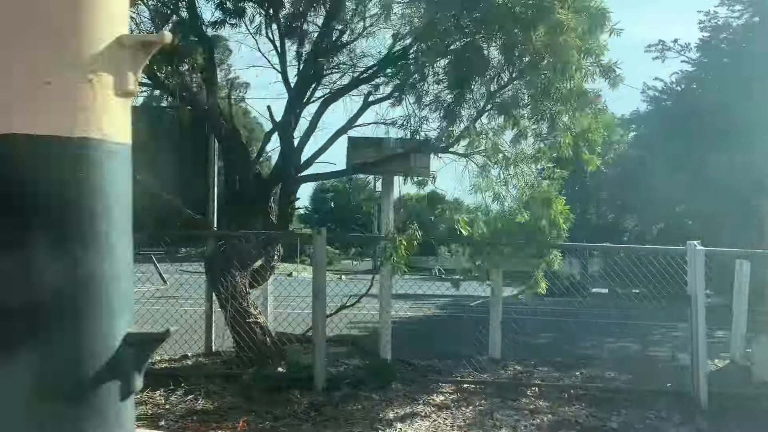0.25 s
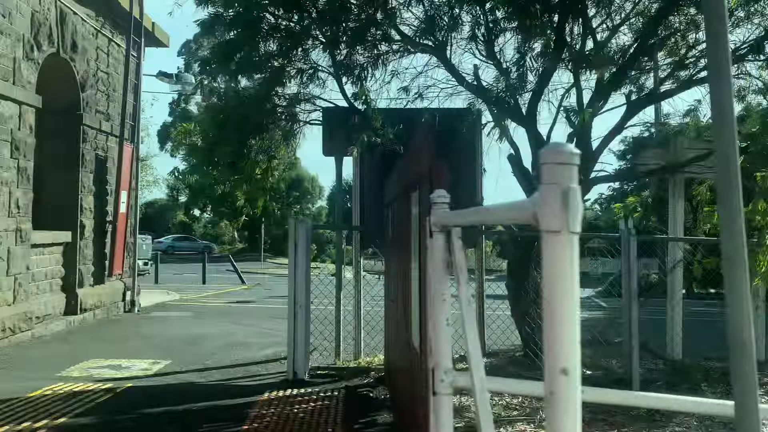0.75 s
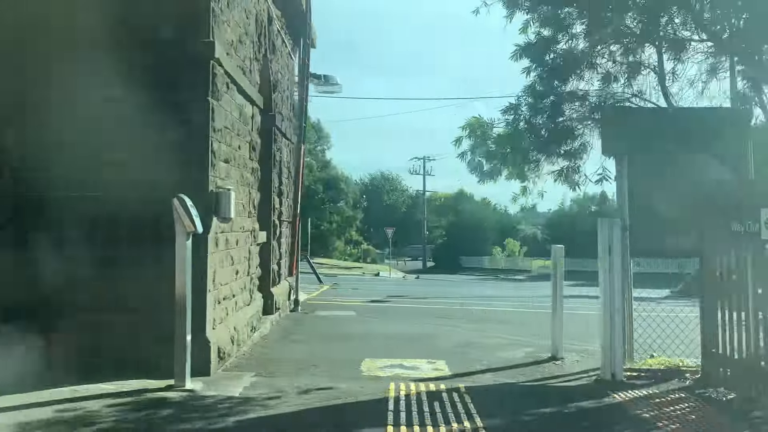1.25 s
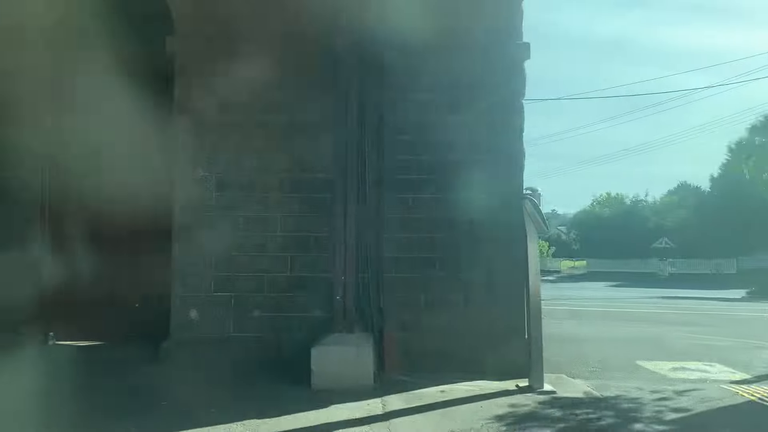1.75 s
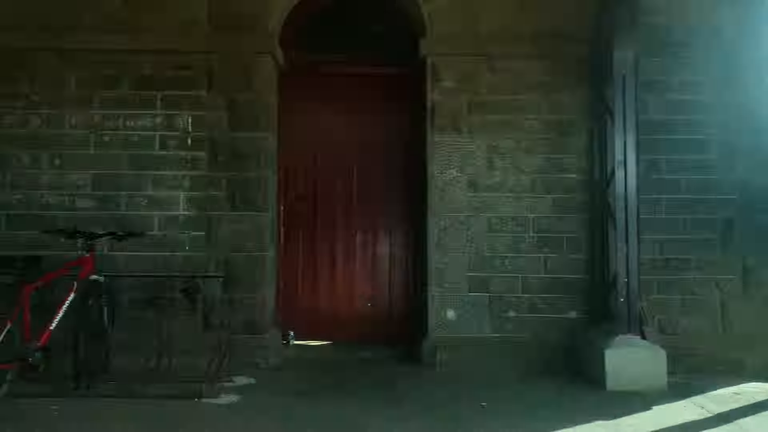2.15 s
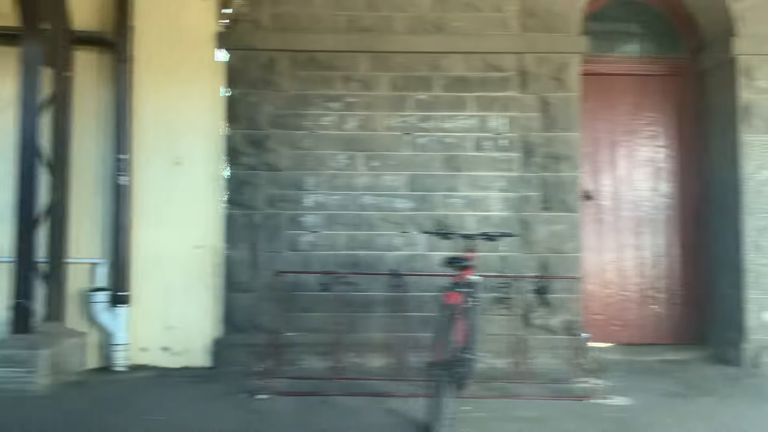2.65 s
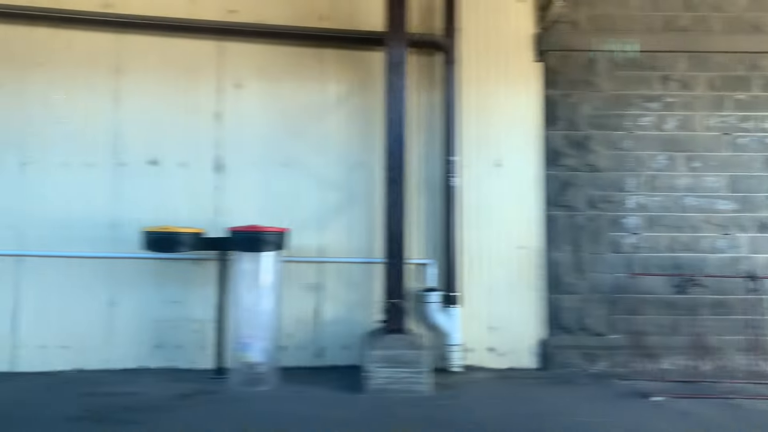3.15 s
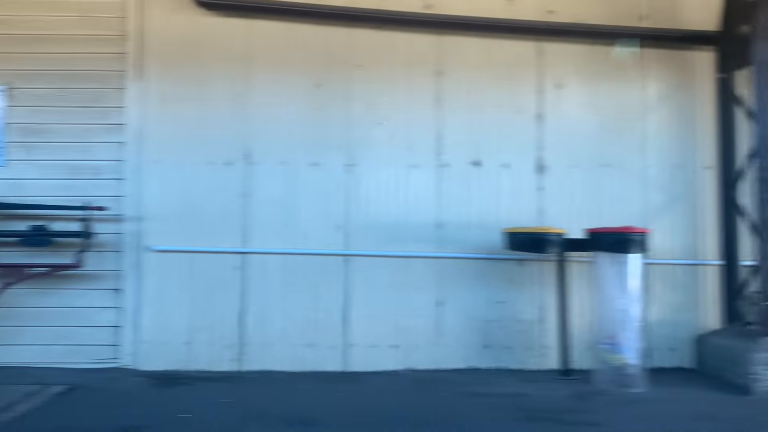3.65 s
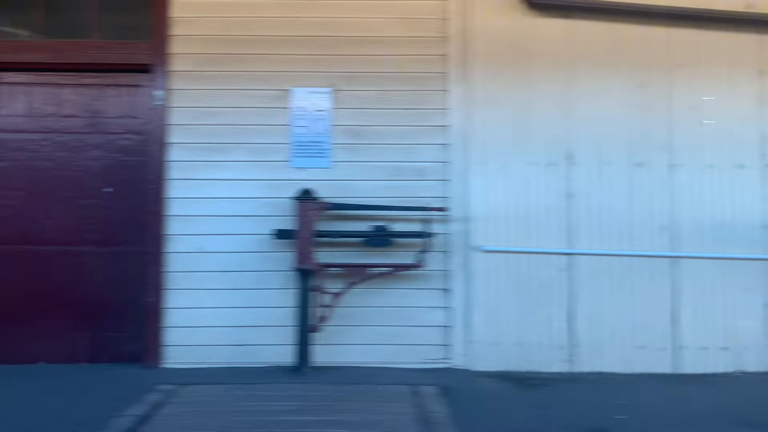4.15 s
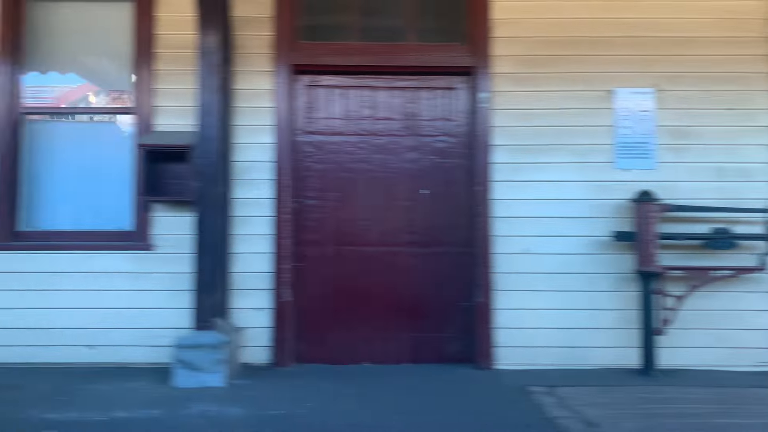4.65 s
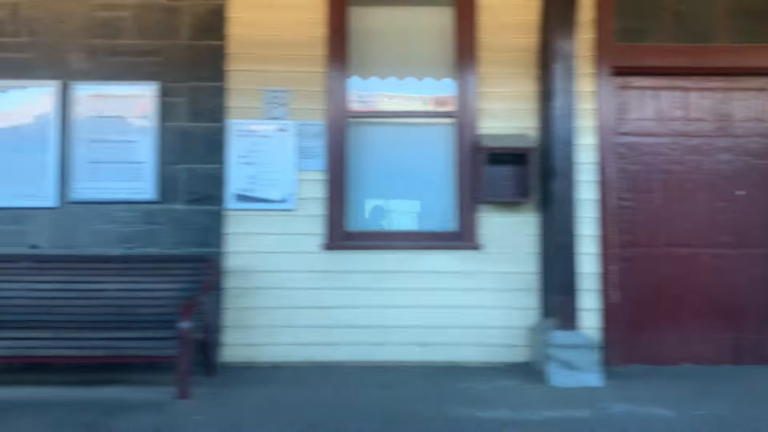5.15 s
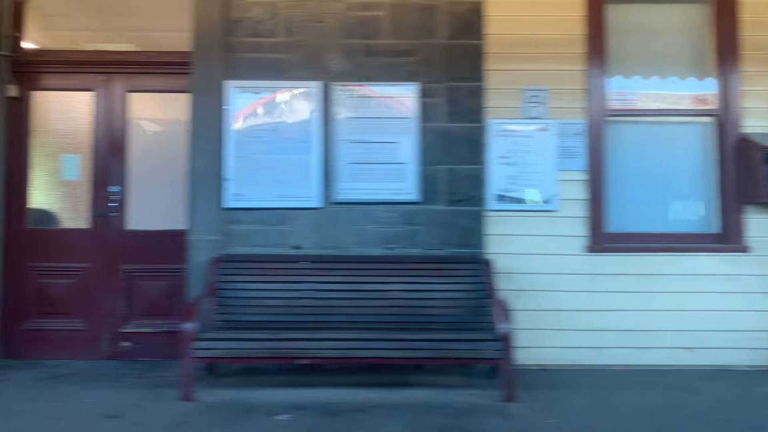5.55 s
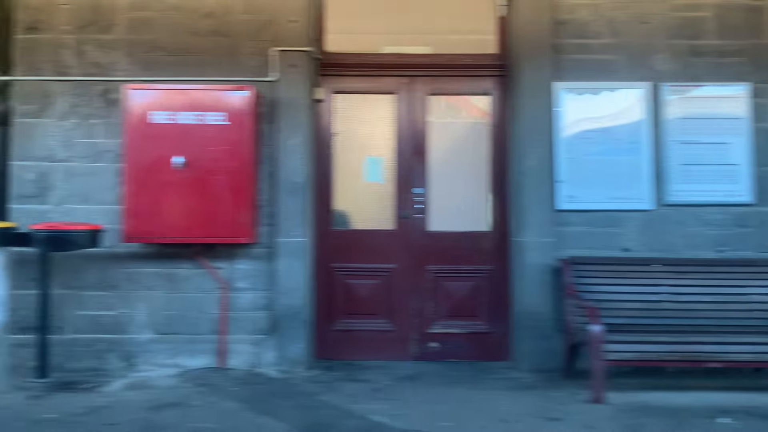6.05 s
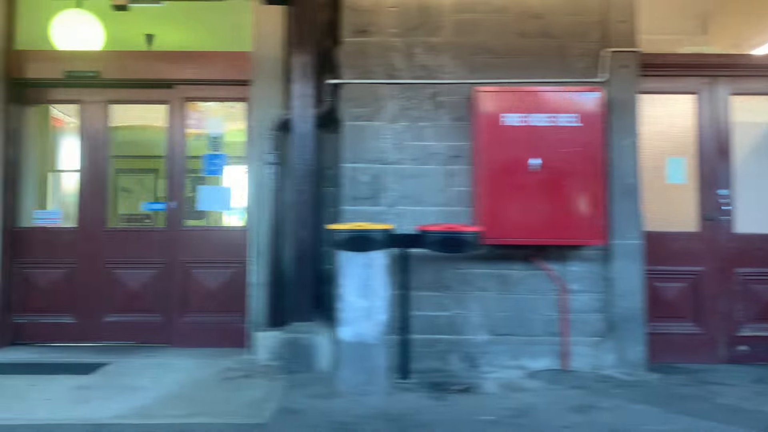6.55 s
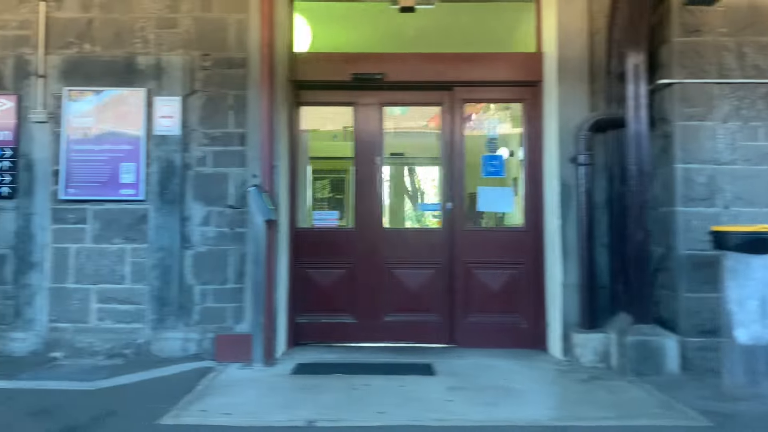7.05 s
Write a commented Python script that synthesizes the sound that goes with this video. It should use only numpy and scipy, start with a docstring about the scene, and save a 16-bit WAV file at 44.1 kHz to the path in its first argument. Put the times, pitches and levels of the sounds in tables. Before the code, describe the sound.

The interior of a diesel railcar rolling slowly past a station, captured in stereo inside the cabin. Throughout, a deep floor rumble dominates, swelling and sinking several times a second, with soft low thumps, notably around 2.2 and 2.9 s. Beneath it the engine drones near 56 Hz, wavering; above it are a faint mid whine, fan hums, diffuse cabin air and a hollow vent rush on the left. From 0.25 to 1.65 s a loose fitting on the right ticks rapidly in broken spells, gritty and bright, with faint high scrapes. From 1.65 to 4.1 s it is silent; a short scrape comes at 2.8, then a sharp click at 3.45, with weaker ones at 3.53 and 3.64. Rattling returns at 4.1, buzzes around 4.6, breaks into short bursts after 5.2, and runs strongest from 6.2 to the end at 7.3. A soft high hiss joins at 6.5, slowly fading, with a tiny click near 6.7.

```python
"""Inside a diesel railcar that rolls slowly past a station platform.
Band-filtered noise gives the wheels' rumble, swelling and lulling, the cabin's air and a resonant vent.
Sine waves give the engine's drone, a thin whine, fan tones, and low thumps and resonances that well up.
A loose fitting ticks in step with the engine: impulses with gritty tails. Decaying modes make sharp clicks.
Filtered noise makes soft, high scrapes, brief narrow-band sounds and, at the end, a hiss with a moving edge."""
import sys
import numpy as np
from scipy import signal
from scipy.fft import rfft, irfft
from scipy.io import wavfile
from scipy.ndimage import uniform_filter1d

SR = 44100
rng = np.random.default_rng(int(sys.argv[2]) if len(sys.argv) > 2 else 0)


def output_pcm(signal):
    """Save a mono or channel-first signal as 16-bit PCM at the path in sys.argv[1].

    Samples are clipped to [-1, 1] before scaling.
    """
    pcm = np.clip(np.atleast_2d(signal).T, -1, 1) * 32767
    wavfile.write(sys.argv[1], SR, np.round(pcm).astype(np.int16))


N = 321489
T = np.arange(N) / SR  # seconds
HZ = np.fft.rfftfreq(N, 1 / SR)


def amp(db):
    """Level and amplitude: decibels become a gain, 20 dB to a factor of ten."""
    return 10 ** (np.asarray(db) / 20)


def unit(x):
    """Normalization: scales a signal to an rms value of 1."""
    return x / np.sqrt(np.mean(x ** 2) + 1e-20)


def curve(rows, column=1):
    """Envelope: one column of a time table, joined linearly at every sample."""
    rows = np.array(rows)
    return np.interp(T, rows[:, 0], rows[:, column])


def spectrum(points):
    """Spectral envelope: a frequency table at every bin, joined on a log frequency axis."""
    hz, value = np.transpose(points)
    return np.interp(np.log(HZ + 1), np.log(hz + 1), value)


def shaped(x, gain):
    """Linear filtering: multiplies the spectrum by a gain for every bin."""
    return irfft(rfft(x) * gain, N)


def noise(gain):
    """Gaussian noise: random complex bins under the given amplitude spectrum, at rms 1."""
    bins = rng.standard_normal(2 * len(HZ)).view(complex)
    return unit(irfft(bins * gain, N))


def drift(rate):
    """Slow random modulation: low-passed noise of rms 1, up to about rate changes a second."""
    return noise(np.exp(-(HZ / rate) ** 2) * (HZ > 0))


def hump(moment, length):
    """Gaussian envelope: height 1 at its moment, 1/e at half a length to either side."""
    return np.exp(-np.minimum((2 * (T - moment) / length) ** 2, 50))


def steadied(x, seconds):
    """Gain control: divides a noise by its running rms, which takes out the slow swells."""
    power = uniform_filter1d(x ** 2, int(seconds * SR))
    return x / np.sqrt(abs(power) + 1e-9)


def from_right(x):
    """Interaural delay: sound from a near source reaches the right microphone first."""
    lag = 9  # samples
    return np.array([np.roll(x, lag), x])


def cabin(spacing_hz=16, ripple_db=1.0):
    """Room response at one spot: body resonances and the ripple of many standing waves, weaker below 500 Hz."""
    # Resonances of the car body. Each row: frequency in Hz, half-width to 1/e in Hz, lift in dB.
    body = [(177, 8, 1), (193, 7.7, 2), (245, 11, 2.5), (307.3, 17, 5), (341.7, 15, 4.5), (422.6, 13, 6),
            (458, 2.9, 5.5), (478, 15, 1.5), (792, 19, 5), (829, 8.7, 4), (867, 6.6, 7), (896, 6.4, 7),
            (940, 16, 5)]
    knots = np.arange(0, SR / 2, spacing_hz)
    ripple = unit(np.interp(HZ, knots, rng.standard_normal(len(knots))))
    ripple = ripple * HZ ** 2 / (HZ ** 2 + 500 ** 2)
    resonances = sum(db * np.exp(-((HZ - hz) / width) ** 2) for hz, width, db in body)
    return amp(ripple_db * ripple + resonances)


def surges(column):
    """Amplitude modulation: swells and lulls of the rumble in dB, over rougher and smoother track."""
    # Swells and lulls of the rumble. Each row: centre in seconds, length in seconds,
    # then the change in dB of the floor boom, of the wall drone and of the roar.
    swells_and_lulls = [(0.13, 0.24, 3.5, 3, 0.5), (0.44, 0.29, 1.5, 4, 4), (0.696, 0.086, 1, 6, -0.5),
                        (1.148, 0.22, 1, -1, 4.5), (1.467, .14, 5, 3.5, 2), (1.71, 0.16, 2.5, 2.5, 2),
                        (2.042, 0.24, 6.5, 0, 2.5), (2.235, 0.088, 4, 7, 0), (2.462, .12, -1.5, -2, -2),
                        (2.866, 0.1, 7.5, 3, 3), (3.1, .1, 3.5, -6.5, -4), (3.249, 0.11, 5.5, 0, -0.5),
                        (3.396, 0.12, 3, -3.5, -1), (3.867, 0.13, -1.5, 2.5, 1), (4.068, 0.12, 5, 6, 3.5),
                        (4.242, 0.095, -1, 8.5, -2), (4.67, .16, 0.5, 7, -0.5), (4.917, 0.11, -4, 6.5, 3),
                        (5.1, 0.049, 1, 0, 5), (5.268, 0.054, -4, 7, -0.5), (5.514, 0.074, 1, 1, 0),
                        (5.726, 0.046, 1.5, 2.5, 4), (5.919, 0.14, 5.5, 2.5, -0.5),
                        (6.194, 0.28, 3.5, 2.5, -1), (6.405, 0.16, 2.5, 2, 4.5), (6.638, 0.2, 1, 1, -1),
                        (7.157, 0.26, -0.5, 3, 3)]
    return sum(row[column] * hump(row[0], row[1]) for row in swells_and_lulls)


def rumble(split_hz=100, roar_hz=175, body_hz=275, boom_db=-29.0, wall_db=-26.5, roar_db=-32.0,
           body_db=-37, side_db=-17):
    """Structure-borne sound: wheels shake floor, walls and fittings; long waves reach both sides nearly alike."""
    # Rumble through the floor. Each row: frequency in Hz, relative level in dB per Hz.
    floor_colour = [(15, -42), (30, -21), (47, -8.5), (62, -0.5), (82, -1), (95, -5.5), (112, 1),
                    (142, -1.5), (168, -8), (215, -14), (245, -13), (268, -21.5), (500, -28), (900, -100)]
    # Upper roar. Each row: time in seconds, change of level in dB.
    roar_course = [(0, 0), (.95, -1), (1.3, -0.5), (1.65, -1.5), (2.6, 2.5), (3.3, 0), (4.3, -1.5),
                   (5.1, 3), (5.7, 1), (6.7, 1), (7.29, 0.5)]
    # Low mids, where the fittings hum. Each row: time in seconds, change of level in dB.
    fittings_course = [(0, 3), (.2, -2), (1.1, -1), (1.3, 0.5), (1.57, -2), (2.05, 0.5), (2.6, -1),
                       (3.9, -1.5), (4.2, -2.5), (4.5, 0), (5.4, -2), (5.7, -2.5), (6.6, -2), (6.8, 0.5),
                       (6.95, -1.5), (7.29, -2)]
    colour = amp(spectrum(floor_colour)) * cabin()
    # Power shares of three low-passes; their complements split the rumble into four bands.
    low, mid, high = (1 / (1 + (HZ / hz) ** 12) for hz in (split_hz, roar_hz, body_hz))
    boom = steadied(noise(colour * np.sqrt(low)), 0.1)
    boom = boom * amp(boom_db + surges(2))
    walls = steadied(noise(colour * np.sqrt((1 - low) * mid)), 0.11)
    walls = walls * amp(wall_db + surges(3))
    roar = steadied(noise(colour * np.sqrt((1 - mid) * high)), 0.17)
    roar = roar * amp(roar_db + curve(roar_course) + surges(4))
    fittings = steadied(noise(colour * np.sqrt(1 - high)), 0.5)
    fittings = fittings * amp(body_db + curve(fittings_course))
    middle = boom + walls + roar + fittings
    side = noise(colour) * amp(side_db) * np.std(middle)  # side_db is relative to the middle
    return np.array([middle + side, middle - side])


def engine(turns, drone_db=-3, waver_db=1):
    """Harmonic excitation: the low orders of the diesel's firing rate boom in the car body."""
    # Engine orders. Each row: multiple of the firing rate, relative level in dB.
    order_levels = [(1, 0.5), (1.5, -17), (2, -13)]
    # Swell and ebb of the drone. Each row: time in seconds, level in dB before drone_db.
    drone_course = [(0, -12.5), (.25, -26.5), (.47, -34), (.7, -27.5), (.9, -26.5), (1.04, -29.5),
                    (1.27, -19.5), (1.6, -21.5), (1.9, -32), (2.13, -21.5), (2.55, -26), (2.95, -23.5),
                    (3.27, -23), (3.45, -22), (3.63, -20.5), (4, -27.5), (4.22, -20), (4.63, -23),
                    (4.92, -40.5), (5.2, -28.5), (5.72, -26.5), (6.01, -39), (6.2, -26), (6.8, -23.5),
                    (7.07, -18.5), (7.29, -25.5)]
    orders = sum(amp(db) * np.cos(2 * np.pi * k * turns) for k, db in order_levels)
    return np.sqrt(2) * orders * amp(curve(drone_course) + drone_db + waver_db * drift(3.6))


def tone(hz, waver, lead):
    """Frequency and amplitude modulation: a wavering line of rms about 1, the left leading by lead radians."""
    phase = 2 * np.pi * (np.cumsum(hz + waver * drift(2.82)) / SR + rng.random())
    level = amp(1.5 * drift(6.1))  # wavers by 1.5 dB rms
    return np.sqrt(2) * level * np.sin([phase + lead / 2, phase - lead / 2])


def machinery(whine_hz=578.0, tones_db=2.5):
    """Tonal noise of rotating machines: faint fan hums, and the drive's whine shifting between the sides."""
    # Fans and auxiliaries. Each row: frequency in Hz, level in dB before tones_db.
    fan_tones = [(117.1, -41.5), (247.6, -47), (297.5, -52), (468, -58), (514, -66.5), (592, -61.5),
                 (601.6, -61.5), (682.3, -63), (739, -70), (1109, -71.5), (1568.6, -71)]
    # The whine. Each row: time in seconds, level in dB, left-right difference in dB, left's lead in radians.
    whine_course = [(0, -44.5, 0, -1.4), (1.3, -44, -3, -1.8), (2.3, -46.5, -2, -1.7),
                    (2.6, -47.5, 2, -3.5), (3.2, -47, 2, -2.5), (3.45, -46.5, 2, -2),
                    (4.8, -46, -5.5, -1.8), (7.29, -45, -4, -1)]
    hums = sum(amp(db + tones_db) * tone(hz, waver=0.96, lead=rng.normal() * hz / 1200)
               for hz, db in fan_tones)
    level, pan, lead = (curve(whine_course, column=k) for k in range(1, 4))
    whine = tone(whine_hz, waver=0.86, lead=lead)
    return hums + whine * amp(level + np.array([pan, -pan]) / 2)


def air(air_db=-43):
    """Diffuse field: rolling and air noise, with a left-right correlation that depends on frequency."""
    # Air noise in the cabin. Each row: frequency in Hz, relative level in dB per Hz.
    air_colour = [(150, -34), (450, -1), (600, -0.5), (860, -2), (1050, -5.5), (1400, -7.5), (2050, -7),
                  (2600, -13.5), (3150, -12.5), (3750, -15.5), (4350, -17.5), (4850, -22), (7000, -25.5),
                  (15000, -59)]
    # Likeness of the two microphones. Each row: frequency in Hz, correlation from -1 to 1 (clipped below).
    likeness = [(200, 0.37), (450, -0.17), (600, 1), (700, 0.098), (900, -0.16), (1350, -0.17), (1800, 0.7),
                (2300, 0.16), (3000, -0.85), (4200, 0.48), (5500, -0.19), (7200, -1.025), (9000, 0.85)]
    colour, same = amp(spectrum(air_colour)), np.clip(spectrum(likeness), -.99, .99)
    shared, separate = rng.standard_normal((2, N))
    left, right = colour * cabin(), colour * cabin()
    right_air = shaped(shared, right * same) + shaped(separate, right * np.sqrt(1 - same ** 2))
    return unit(np.array([shaped(shared, left), right_air])) * amp(air_db)


def vent(vent_db=2, far_db=-14, lead=0.99, surge_db=1.3):
    """Duct resonance: turbulent air on the left excites bands that surge independently."""
    # Duct resonances. Each row: frequency in Hz, width in Hz, relative level in dB (per Hz at the peak).
    duct_modes = [(841, 75, -2), (1150, 280, -6.5), (1690, 55, -4.5), (1920, 150, -3.5), (2082, 73, 3),
                  (2278, 160, 0.5), (2470, 85, 1), (2636, 81, -5.5), (2975, 520, -15.5), (4236, 120, -15)]
    # Course of the rush. Each row: time in seconds, level in dB before vent_db.
    draught = [(0, -44.5), (.14, -49), (.3, -45.5), (.8, -47.5), (1.25, -45), (1.45, -46), (2.02, -45),
               (2.2, -44.5), (2.8, -44), (4.15, -44), (4.3, -43), (4.52, -43), (4.65, -43.5), (5.4, -43.5),
               (6.2, -44), (7.29, -43.5)]
    room = cabin()
    rush = np.zeros(N)
    for hz, width, db in duct_modes:
        band = noise(room / (1 + ((HZ - hz) / width) ** 2) ** (3 / 2))
        rush += band * np.sqrt(width) * amp(db + surge_db * drift(16))
    rush = unit(rush) * amp(curve(draught) + vent_db)
    far = amp(far_db) * shaped(rush, np.exp(-1j * lead))  # the right lags by lead radians
    return np.array([rush, far])


def scrapes(rest_db=-76.0, rise_s=0.042, fall_s=0.083):
    """Friction noise: fine rubbing near the right, barely there at rest and swelling in each scrape."""
    # Soft scrapes. Each row: start in seconds, length in seconds, level in dB, pitch as ratio of the colour.
    strokes = [(0.245, 0.18, -70, .95), (.57, 0.34, -71, 0.93), (1.16, 0.17, -64.5, 0.99),
               (1.42, .2, -72, 1), (1.85, 0.2, -66, 0.91), (2.805, 0.11, -60, 0.96), (4.1, 0.66, -69.5, 1),
               (4.85, 0.54, -69, 0.96), (6.274, 0.3, -65.5, 0.98)]
    # Colour of the rubbing. Each row: frequency in Hz, relative level in dB per Hz.
    rub_colour = [(3000, -10.5), (5500, 6), (6900, 0.5), (7300, 2), (7900, 7), (9000, 12), (10100, -5),
                  (10500, -8), (10900, -22.5), (15000, -38)]
    colour = amp(spectrum(rub_colour))
    rub = noise(colour) * amp(rest_db)
    for start, length, db, pitch in strokes:
        rise = np.clip((T - start) / rise_s, 0, 1)
        fall = np.exp(-np.maximum(T - start - length, 0) / fall_s)
        stroke = noise(np.interp(HZ / pitch, HZ, colour))
        rub = rub + stroke * amp(db) * rise * fall
    grain = unit(amp(1.0 * drift(120)))  # fast flicker of 1 dB rms
    return from_right(rub * grain)


def narrow_bursts():
    """Narrow-band noise: brief faint squeaks, and short ringing streaks and rough patches of the vent."""
    # Brief narrow-band sounds. Each row: centre in seconds, length in seconds, frequency in Hz,
    # half-width to 1/e in Hz, peak level in dB.
    bursts = [(.105, 0.1, 3510, 150, -58), (.48, .06, 1580, 60, -51), (1.044, .09, 2000, 60, -51),
              (1.25, .2, 1450, 130, -51), (1.77, .3, 3420, 170, -57.5), (2.803, 0.22, 2090, 39.8, -56),
              (2.89, .08, 14830, 160, -75), (2.963, 0.077, 8900, 250, -68), (4.297, 0.13, 2070, 34.4, -53),
              (4.5, .16, 2070, 35, -50)]
    out = np.zeros(N)
    for moment, length, hz, width, db in bursts:
        band = noise(np.exp(-((HZ - hz) / width) ** 2))
        out += band * hump(moment, length) * amp(db)
    return from_right(out)


def thumps_and_resonances(waver_hz=1.595):
    """Gliding sinusoids: low thumps and resonances that well up and sink, their pitch gliding and wavering."""
    # Low thumps and resonances. Each row: centre in seconds, length in seconds, frequency at the centre in Hz,
    # glide in Hz per second, peak level in dB.
    swells = [(.12, 0.16, 71.4, -17, -22), (0.42, 0.13, 136, -41.5, -22), (1.15, 0.43, 248, 0.5, -41),
              (1.5, 0.42, 117.2, -0.5, -29.5), (1.6, 1.4, 468.5, 0.5, -52), (2.096, 0.19, 140, 35.5, -24),
              (2.235, 0.098, 123.1, -50, -19), (2.757, 0.76, 117.2, 0, -28), (2.87, 0.078, 88, 649.5, -16),
              (3.25, 0.1, 62, -52, -24.5), (3.627, 0.22, 130, 30, -25), (3.702, 0.79, 471, 1, -53),
              (3.99, 0.31, 247.6, -2.5, -41.5), (4.114, 0.11, 148.4, 39.5, -23.5),
              (4.26, 0.11, 130, 0, -27), (4.652, 0.12, 134.5, -60.5, -24.5), (5.497, 1.1, 469, -0.5, -49.5),
              (5.199, 1.4, 246.8, -0.5, -41), (6.62, 0.21, 115.2, 55, -20.5),
              (6.96, 0.21, 121.8, 40, -22.5)]
    out, waver = np.zeros(N), waver_hz * drift(3.24)
    for moment, length, hz, glide, db in swells:
        turns = np.cumsum(hz + glide * (T - moment) + waver) / SR + rng.random()
        out += np.sqrt(2) * amp(db) * hump(moment, length) * np.sin(2 * np.pi * turns)
    return out


def rattle(turns, tick_db=-27, spread_db=1.0, jitter_s=.002, chatter_gain=.6, chatter_s=.003,
           buzz_hz=4300, buzz_width_hz=380):
    """Periodic impact: a loose fitting strikes at most once per firing cycle, with a gritty tail and panel buzz."""
    # Spells of rattling. Each row: start in seconds, end in seconds, share of cycles that strike,
    # force in dB relative to tick_db.
    spells = [(.24, .46, .93, -2.5), (.555, .7, .7, -1), (.745, .79, .95, -3), (.84, .9, .7, 1.5),
              (.94, 1, .95, -1), (1.16, 1.36, .65, -0.5), (1.42, 1.65, .85, -0.5), (4.08, 4.25, .72, -2.5),
              (4.25, 4.82, .95, 0), (4.85, 5.14, .85, -1), (5.19, 5.25, .6, .5), (5.3, 5.425, .9, 1.5),
              (5.555, 5.595, .95, 0), (5.665, 5.745, .8, -1), (5.775, 5.855, .97, 0), (5.93, 5.95, .97, -1),
              (6.04, 6.06, .97, -3), (6.16, 6.3, .65, 4.5), (6.3, 6.55, .97, 1.5), (6.55, 7.29, .85, 2)]
    # Colour of one tick. Each row: frequency in Hz, gain in dB.
    tick_colour = [(1200, -24), (3000, -9), (4300, -1), (5000, -7), (6200, -6), (7300, -7), (7800, 2),
                   (9100, 0), (10200, -13), (11700, -25), (12800, -30), (16000, -38)]
    # A panel buzzing along. Each row: centre in seconds, length in seconds, gain in dB.
    buzz_spells = [(1.26, .22, 10.5), (4.596, 0.75, 7), (6.797, 1.3, 7)]
    cycles = T[1:][np.diff(np.floor(turns)) > 0]
    chance = rng.random(len(cycles))
    late, size = rng.standard_normal((2, len(cycles)))
    at = np.clip((cycles + jitter_s * late) * SR, 0, N - 1).astype(int)
    blows = np.zeros(N)
    for start, end, share, db in spells:
        strikes = (cycles >= start) & (cycles < end) & (chance < share)
        blows[at[strikes]] = amp(tick_db + db + spread_db * size[strikes])
    # Each blow sets off noise that decays exponentially.
    keep = np.exp(-1 / (chatter_s * SR))
    chatter = signal.lfilter([np.sqrt(1 - keep ** 2)], [1, -keep], blows) * rng.standard_normal(N)
    buzz = shaped(chatter, np.exp(-((HZ - buzz_hz) / buzz_width_hz) ** 2))
    buzz = buzz * sum(amp(db) * hump(moment, length) for moment, length, db in buzz_spells)
    ticks = shaped(blows + chatter_gain * chatter, amp(spectrum(tick_colour)))
    return from_right(ticks + buzz)


def clicks(click_db=-35, room_db=-9, room_t60=.13):
    """Modal decay: a small hard part snaps and settles, each contact of its own brightness, with a cabin tail."""
    # Sharp clicks. Each row: start in seconds, level in dB relative to click_db, left-right difference in dB,
    # brightness in dB per octave about 9 kHz.
    snaps = [(3.448, 1, 5, 5), (3.4497, -8, 2, -3), (3.471, -19, -3, -3), (3.530, -11, 3, 14),
             (3.5316, -19, -1, 10), (3.5348, -18, -3, 6), (3.640, -22, -3, 29), (3.668, -40, 0, -28),
             (6.6865, -18, -2, -4)]
    # Modes of the part. Each row: frequency in Hz, relative level in dB, time to fall 60 dB in seconds.
    modes = [(3300, -9, .008), (4430, -5, .008), (5500, -14, .008), (6600, -3, 0.0085), (7375, -4, 0.0081),
             (7900, -10, 0.0082), (8400, -9.5, 0.0088), (9500, -27, 0.22), (10150, -11, 0.0072),
             (12100, -22, .005), (13400, -14, .005), (14800, -24, .007)]
    out = np.zeros((2, N))
    t = T[:SR // 4]
    for moment, db, pan_db, tilt_db in snaps:
        ring = sum(amp(level + tilt_db * np.log2(hz / 9000) - 60 * t / t60) * np.sin(2 * np.pi * hz * t)
                   for hz, level, t60 in modes)
        echo = rng.standard_normal((2, len(t))) * amp(-60 * t / room_t60)
        echo = echo / np.linalg.norm(echo[0])
        tail = signal.fftconvolve(ring[None], echo, axes=1)[:, :len(t)]
        start = round(moment * SR)
        gains = amp(click_db + db) * amp([[pan_db / 2], [-pan_db / 2]])
        out[:, start:start + len(t)] += (ring + amp(room_db) * tail) * gains
    return out


def scattered(source, share=.25):
    """Direct and diffuse sound: a share of the power comes scattered by the cabin, the rest from the right."""
    diffuse = np.array([source(), source()])  # a fresh noise at each microphone
    return np.sqrt(1 - share) * from_right(source()) + np.sqrt(share) * diffuse


def hiss():
    """Broadband friction: a high rubbing hiss under a steep low-pass edge that moves, mostly upward."""
    # Course of the hiss. Each row: time in seconds, level in dB before the edge cuts, edge in Hz.
    hiss_course = [(6.45, -82, 9300), (6.56, -59, 9700), (6.64, -58, 10600), (6.78, -57.5, 10800),
                   (6.88, -58.5, 10700), (7.06, -61, 11200), (7.29, -64, 10900)]
    # Colour below the edge. Each row: frequency in Hz, relative level in dB per Hz.
    hiss_colour = [(3000, -16), (5400, 0), (6600, -3), (8300, -1), (9500, 2), (11000, 3)]
    rub = noise(amp(spectrum(hiss_colour)) * (HZ < 11500))
    hz, t, frames = signal.stft(rub, SR, nperseg=512)
    edge = np.interp(t, T, curve(hiss_course, column=2))
    frames = frames / (1 + (hz[:, None] / edge) ** 80)
    edged = signal.istft(frames, SR, nperseg=512)[1][:N]
    return edged * amp(curve(hiss_course)) * (T > hiss_course[0][0])


def scene(firing_hz=56.1, wander_hz=.04):
    """Superposition: all sources add, and one nearly steady firing cycle drives both drone and rattle."""
    turns = np.cumsum(firing_hz + wander_hz * drift(0.9)) / SR
    steady = rumble() + engine(turns) + machinery() + air() + vent()
    passing = scrapes() + narrow_bursts() + thumps_and_resonances() + rattle(turns) + clicks()
    return steady + passing + scattered(hiss)


def record(dry, fade_s=.005, edge_hz=15500):
    """Windowing and band limitation: a soft start and stop, then a steep low-pass."""
    faded = dry * signal.windows.tukey(N, 2 * fade_s * SR / N)
    lowpass = signal.firwin(511, edge_hz, window=("kaiser", 9), fs=SR)
    return signal.oaconvolve(faded, lowpass[None], "same")


dry = scene()
out = record(dry)
output_pcm(out)
```